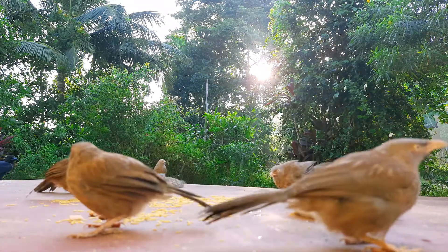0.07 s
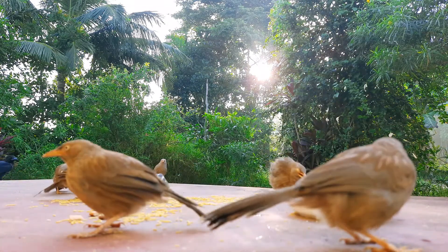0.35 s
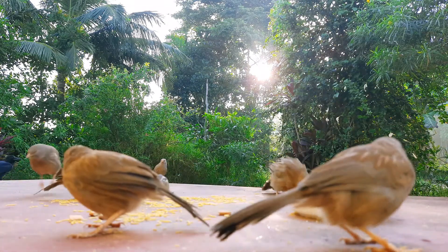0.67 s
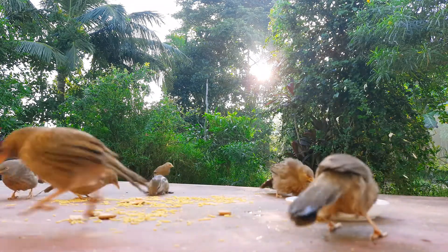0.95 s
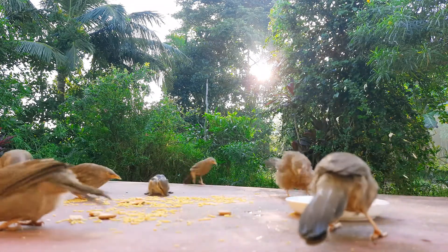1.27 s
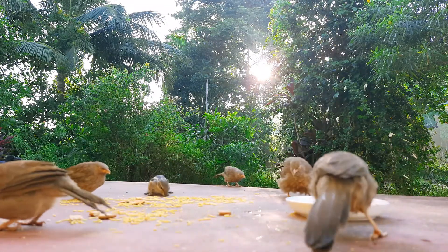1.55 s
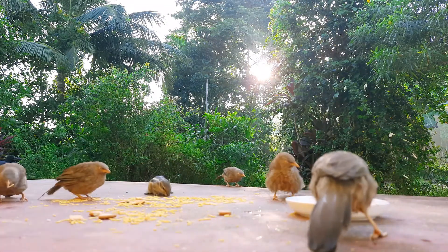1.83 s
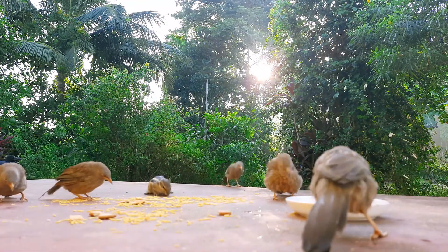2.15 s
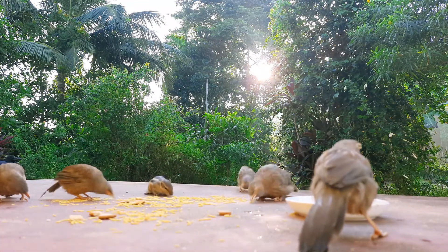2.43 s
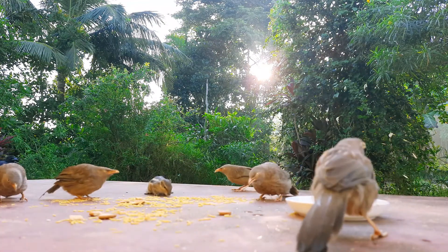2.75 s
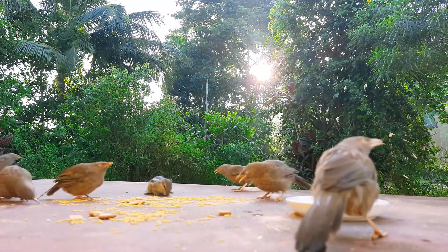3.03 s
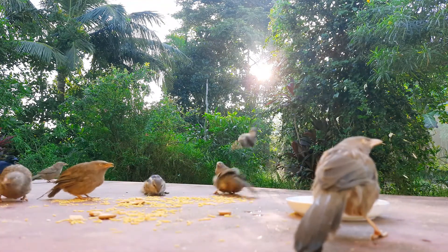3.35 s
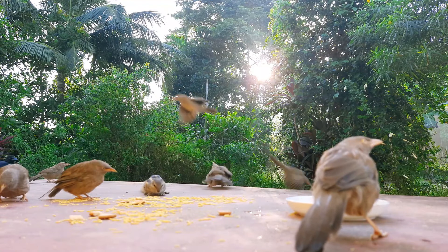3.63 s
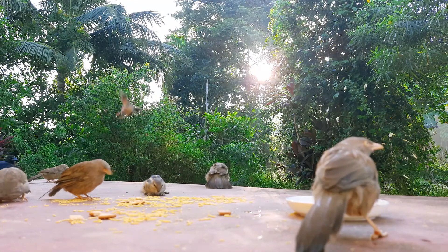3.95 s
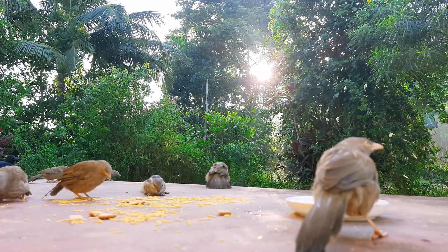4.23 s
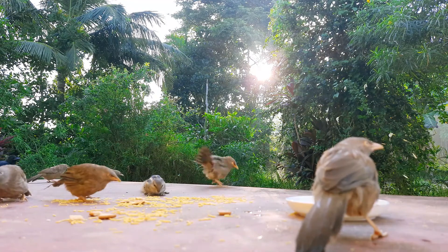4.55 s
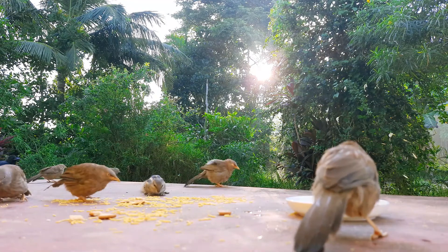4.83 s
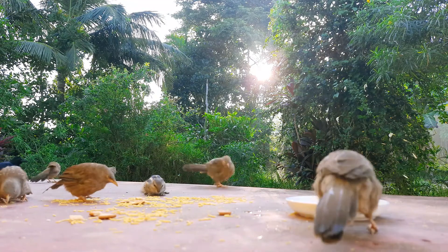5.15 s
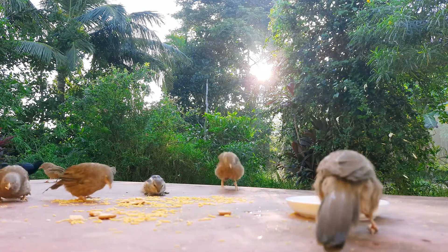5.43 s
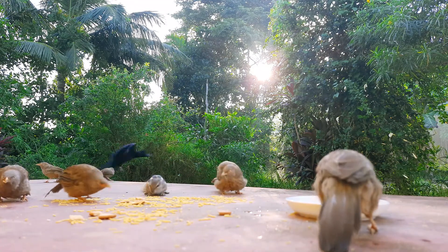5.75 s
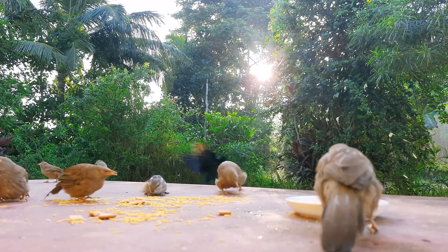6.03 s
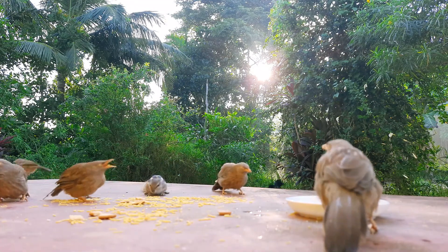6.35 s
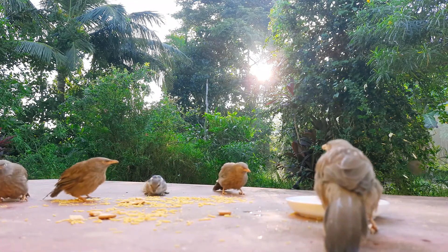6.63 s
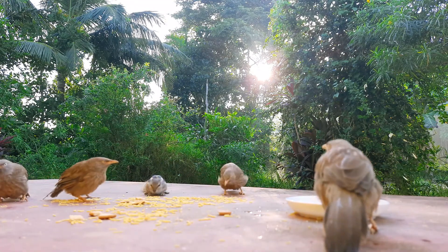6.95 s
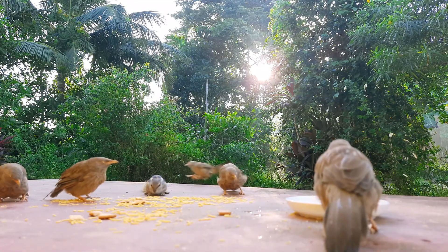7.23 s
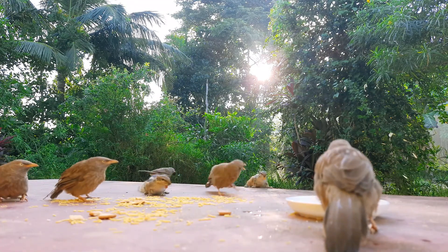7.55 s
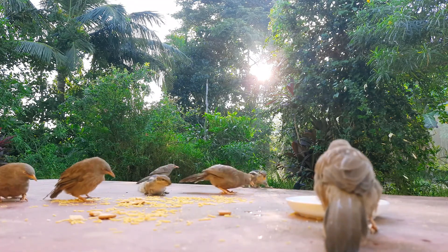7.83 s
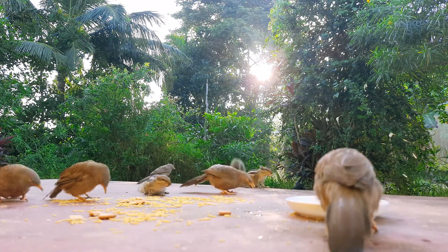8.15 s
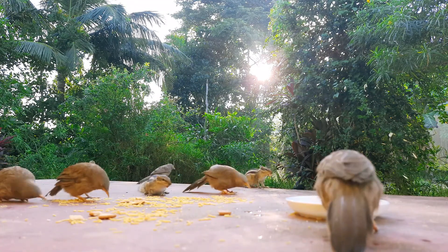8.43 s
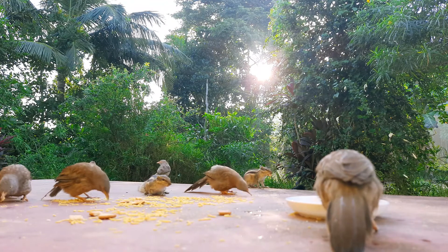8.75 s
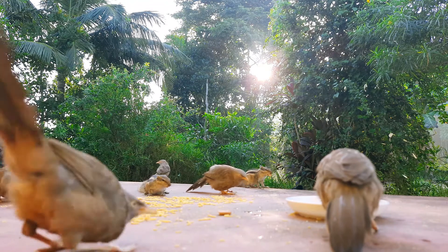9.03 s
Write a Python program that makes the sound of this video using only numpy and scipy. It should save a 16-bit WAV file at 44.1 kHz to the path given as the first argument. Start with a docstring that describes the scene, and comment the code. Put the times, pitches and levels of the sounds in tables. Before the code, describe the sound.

A flock of birds feeds close to the microphone on a garden terrace, a little to the left. It opens with a quick burst of harsh chucks, a squawk and fluttering wings. Scattered calls and pecks follow, with the sharpest clicks and more flutters a few seconds in. Farther off a dove coos and small birds trill over faint insects. Later a soft low rumble swells and fades with a few hoots.

```python
"""Babblers feed close by on a garden terrace, giving harsh falling chucks and level squawks.
Each call is a source and a filter: the syrinx gives a hoarse tone and irregular pulses, and the throat
and beak resonate. Beaks and claws tap the floor, feathers rustle and wings push puffs of air.
Farther off a dove coos with a rolling purr, small birds trill, chirp and whistle, and insects sing.
Late on, a low rumble swells and fades, with a few soft hoots. Terrace and trees add diffuse echoes."""
import sys
import numpy as np
from scipy import signal
from scipy.fft import rfft, irfft, next_fast_len
from scipy.io import wavfile
from scipy.ndimage import map_coordinates

SR = 44100
rng = np.random.default_rng(int(sys.argv[2]) if len(sys.argv) > 2 else 0)


def store_pcm(level_fs):
    """Save levels as 16-bit WAV."""
    pcm = np.round(np.clip(level_fs, -1, 1) * 32767).astype(np.int16)
    wavfile.write(sys.argv[1], SR, np.atleast_2d(pcm).T)


N = 400428

# Event levels are relative, ahead of the gains of the mix; pan is left level minus right level.
# falling calls: t/s, length/s, mid-register level/dB, start f/Hz, roughness (0-1),
# low register/dB re mid, high register/dB re mid
CHUCKS = [(0, 0.011, -49, 847, 1, 3, -2), (.046, .055, -39, 1224, 0.45, -9, -6),
          (0.138, .049, -38, 1116, 0.35, -8, -9), (0.184, .062, -40, 1001, 0.7, -1, -7),
          (.234, .042, -40, 985, 0.37, -5.5, -8), (.334, 0.043, -47, 837, 0.65, -5.5, -6),
          (0.506, .055, -57, 913.5, 0.92, 2, -4.5), (0.893, .06, -42, 908.4, 0.82, -15.5, -10),
          (2.117, .064, -71.5, 923, 0.93, 6.5, -8), (3.112, .067, -46, 1056, 0.83, 0, 0),
          (3.402, .055, -42, 1294, 0.44, -10, -3.5), (3.502, 0.044, -44.5, 1091, 0.42, -6.5, -9),
          (3.602, 0.046, -49, 1027, 0.19, -3, -11), (3.919, .066, -47.5, 993.4, 0.94, 3, -2.5),
          (4.237, .067, -47, 907, 0.89, -4, -4), (4.671, .055, -51, 1057, 0.89, 5.5, -1),
          (5.3, .072, -48.5, 1118, 0.85, -7.5, -10), (5.811, .18, -76, 954.4, 0.92, -3.5, 0),
          (6.002, .15, -78, 953, 0.88, -2.5, -1), (7.553, .047, -48, 1107, 0.68, -2.5, -10.5),
          (7.709, .055, -46, 1106, 0.71, 1, -3), (8.071, .066, -48, 1140, 0.84, -7, -11)]
# calls of nearly level pitch: the columns of CHUCKS, then pan/dB
SQUAWKS = [(.283, .064, -31, 944, .55, -7.5, 3, .5), (1.15, .2, -66.5, 770, .85, -20, -9, 4.5),
           (2.943, .06, -44.5, 810, .92, -5.5, -6, 6), (3.701, .075, -39, 830, .8, -14.5, -3, 7),
           (4.526, .061, -53, 764, .85, -4.5, -18, 7), (7.734, .063, -46, 760, .9, -4, 1, 6),
           (8.2, .09, -64, 780, .9, -1, -8, 5)]
# resonances of throat and beak in each kind of call: f/Hz, gain/dB
CHUCK_THROAT = [(250, -28), (480, -10), (750, -5), (1200, -5), (1750, 1), (2450, -1), (3200, -15),
                (4300, -3), (5350, -15), (6400, -6), (8500, -14), (11000, -27), (16000, -37)]
SQUAWK_THROAT = [(350, -30.5), (650, -8), (950, -3), (1500, -9), (2650, -0.5), (3300, -7.5), (4150, 0.5),
                 (5200, -7.5), (6300, -7.5), (8200, -21), (11000, -32.5), (16000, -34.5)]
# impacts of beak and claw on the floor: t/s, level/dB, relative treble/dB, pan/dB
TAPS = [(1.1533, -47.5, -11, 8), (1.279, -38, -7.5, 12), (1.8138, -46, -17.5, 10), (2.356, -43, -16.5, 11),
        (2.7639, -50.5, -14, 7), (2.9488, -30.5, -26.5, 5), (3.4579, -41, -10, 12),
        (3.471, -20.5, -15.5, 6), (3.4808, -40, -14, 4), (3.6022, -20.5, -22.5, 8), (4.9288, -52, -18, 4),
        (5.5794, -48, -14.5, 5.5), (8.6879, -49, -13, 10.5), (8.9142, -44.5, -14, 9), (8.99, -49, -14, 12)]
# modes of the beak: f/Hz, width/Hz (unused), level/dB
BEAK_MODES = [(1440, 420, -9), (2320, 310, -0.5), (3723, 410, -10.5), (6240, 440, -10.5)]
# feathers brushing and feet scuffing: t/s, length/s, level/dB
SCUFFS = [(0.162, .22, -51), (0.378, 0.1186, -73), (1.26, .066, -72), (2.46, .05, -68.5),
          (3.205, .066, -57), (3.297, 0.068, -62), (3.577, .09, -53.5), (3.963, .1, -67.5),
          (5.62, .14, -68.5), (7.283, 0.088, -65.5), (8.885, .18, -74)]
# spectrum of that friction: f/Hz, level/dB
RUSTLE_SPECTRUM = [(300, -16), (800, -6.5), (1400, -5), (2300, -2.5), (4000, -10.5), (7000, -5.5),
                   (11000, -15.5), (16000, -10.5)]
# bursts of low puffs of air, the first a gust, the rest wingbeats: t/s, length/s, level/dB, spectral peak f/Hz
FLUTTERS = [(0.168, .28, -47, 66.5), (0.517, 0.081, -57, 95), (2.098, .24, -67.5, 65.3),
            (3.108, .28, -60, 138), (3.568, .11, -50.5, 119), (3.934, .26, -54.5, 165.6),
            (4.223, .13, -63, 143), (7.719, 0.067, -59, 190)]
# the dove's notes: t/s, length/s, base f/Hz, lift of the opening crest/Hz, crest length/s, level/dB
COOS = [(1.456, 0.068, 550, 25, .09, -65), (2.054, 0.08, 557, 45.8, 0.087, -61.5),
        (2.268, 0.72, 586.1, 130.5, .12, -58), (3.348, .83, 605, 114.5, .39, -55),
        (4.494, 0.4, 588, 129.5, 0.33, -56.5)]
# runs of pips: start t/s, end t/s, period/s, f/Hz, level/dB, pip length/s, end f over start f
TRILLS = [(3.02, 3.891, .071, 2993, -62.5, 0.029, .95), (6.378, 7.201, 0.23, 2465, -73.5, .06, 1.05),
          (7.169, 8.199, .07, 2986, -66.5, 0.03, .95)]
# a high arched note: t/s, length/s, top f/Hz, level/dB
SQUEAK = [(7.268, 0.059, 2850, -53)]
# small birds' whistles: t/s, length/s, start f/Hz, end f/Hz, level/dB
WHISTLES = [(1.444, 0.12, 2966, 3120, -69.5), (2.794, 0.095, 2460, 2450, -76), (6.49, .07, 2184, 1760, -76),
            (8.39, .04, 2120, 2040, -72.5)]
# onsets of one far bird's buzzy chirp: t/s
CHIRP_TIMES = [.44, 1.469, 2.56, 4.42, 5.62, 6.8, 8.291]
# low distant notes: t/s, length/s, top f/Hz, level/dB
HOOTS = [(1.88, 0.25, 395.4, -74), (6.45, .14, 265.4, -60.5), (6.68, 0.35, 273, -54.5),
         (6.99, 0.3, 119.5, -52.5), (7.45, 0.219, 279.8, -61.5), (8.32, 0.18, 314, -77)]
# single crickets: f/Hz, chirp rate/Hz, level/dB
CRICKETS = [(7420, 18, -76), (7550, 13, -75.5), (7240, 3.2, -79), (8000, 9, -80.5)]
# spectrum of the insect chorus: f/Hz, level/dB
CHORUS_SPECTRUM = [(5500, -30.5), (6700, -13.5), (7450, -6.5), (8100, -7), (8700, -8), (10000, 0.5),
                   (11000, -19.5), (12500, -32.5)]
# envelope of the rumble: t/s, level/dB
RUMBLE_ENVELOPE = [(5.4, -88), (5.89, -63.5), (6.45, -65), (6.48, -52.5), (6.57, -58), (7.18, -50.5),
                   (7.44, -64), (7.55, -62.5), (8.2, -89.5)]
# spectra of the rumble and of the garden air: f/Hz, level/dB
RUMBLE_SPECTRUM = [(18, -47), (30, -20), (81, -7), (109, -8.5), (144, -2), (260, -4), (344, -21.5),
                   (398, -19.5), (1500, -43), (1950, -53.5), (3300, -120)]
AIR_SPECTRUM = [(15, -42.5), (25, -4), (130, 2.5), (170, -8.5), (217, -8), (326, -10.5), (405, -9),
                (503, -26.5), (575, -9), (911, -26), (2110, -25), (3700, -32.5), (5300, -26), (7510, -10.5),
                (8590, -19.5), (16000, -31.5)]
# reverberation times of the two spaces: f/Hz, T60/s
TERRACE_T60 = [(300, 0.32), (2000, 0.061), (10000, 0.099)]
GARDEN_T60 = [(150, 0.53), (600, 0.57), (2500, .5), (10000, 0.061)]


def babbler_calls(rows, throat, jitter, rasp_hz, breath, overtone_db, swell, lag_s_per_db=.00007):
    """Source-filter model: the syrinx mixes harmonics with irregular pulses; throat and beak resonate."""
    out = np.zeros((2, N))
    for s, length, db, start_hz, end_hz, rough, low_db, high_db, pan_db in rows:
        t = clock(length)
        n = len(t)
        glide = (end_hz / start_hz) ** (t / t[-1])
        phase = cycle(start_hz * glide * (1 + jitter * rough * wobble(n, 900)))  # an unsteady membrane
        tone = unit(sum(amp(overtone_db * max(k - 2, 0)) * np.cos(k * phase) for k in range(1, 13)))
        pulse_count = np.cumsum(rasp_hz * glide * np.exp(.35 * wobble(n, 500))) / SR
        pulses = np.diff(np.floor(pulse_count), prepend=0) * amp(2.3 * rng.standard_normal(n))
        rasp = unit(unit(pulses) + breath * rng.standard_normal(n))
        source = (np.sqrt(1 - rough) * tone + np.sqrt(rough) * rasp) * arch(t, swell)
        gape = np.exp(0.097 * rng.standard_normal())  # each opening of the beak shifts the resonances
        voice = filtered(np.pad(source, (0, 256)), lambda hz: amp(along(throat, hz * gape)))
        low = amp(low_db) * register(voice, 1150, "low")
        middle = register(voice, [1200, 3000], "band")
        high = amp(high_db) * register(voice, 3200, "high")
        left, right = panned(amp(db) * (low + middle + high), pan_db)
        add(out[0], s, left)
        add(out[1], s + lag_s_per_db * pan_db, right)  # the longer path arrives later
    return out


def chucks(end_hz=664.5, pan_db=7):
    """Exponential glide: each chuck falls from its own starting frequency to a common one."""
    rows = [(s, length, db, hz, end_hz, *timbre, pan_db) for s, length, db, hz, *timbre in CHUCKS]
    return babbler_calls(rows, CHUCK_THROAT, jitter=.15, rasp_hz=416.1, breath=0.79,
                         overtone_db=-15, swell=1.9)


def squawks(rise=1.015):
    """Aperiodic vibration and strong upper harmonics make a harsh call whose pitch barely rises."""
    rows = [(s, length, db, hz, hz * rise, *rest) for s, length, db, hz, *rest in SQUAWKS]
    return babbler_calls(rows, SQUAWK_THROAT, jitter=.06, rasp_hz=482.0, breath=0.36,
                         overtone_db=0.5, swell=1.4)


def taps(ring_db=-5, ring_t60=0.0092, tick_db=11.5, tick_t60=0.0057, lightness=.33):
    """An impact excites damped modes of the beak and a noisy tick; a lighter touch rings less."""
    out, t = np.zeros((2, N)), clock(0.033)
    tick_spectrum = [(1000, -25), (3500, -3.0), (6500, 3.5), (16000, -1)]  # f/Hz, level/dB
    for s, db, treble_db, pan_db in list(TAPS) + pecks():
        ring = np.zeros(len(t))
        for hz, _, mode_db in BEAK_MODES:
            detuned_hz = hz * (1 + 0.018 * rng.standard_normal())
            ring += amp(mode_db - 60 * t / ring_t60) * np.sin(2 * np.pi * detuned_hz * t)
        ring *= amp(ring_db + lightness * min(db + 31.0, 0)) / np.abs(ring).max()
        tick = noise(len(t), tick_spectrum, coherence=1.0) * amp(-60 * t / tick_t60)
        add(out, s, panned(amp(db) * (ring + amp(tick_db + treble_db) * tick), pan_db))
    return out


def pecks(per_s=4, db=-59, spread_db=3, treble_db=-11, pan_db=5):
    """A random point process: light pecks at crumbs, as rows like those of TAPS."""
    draws = rng.random((int(per_s * N / SR), 2))
    return [(when * N / SR, db + spread_db * (2 * force - 1), treble_db, pan_db) for when, force in draws]


def wings(beat_hz=21.74, grain_db=4.0, fade_db=9):
    """Friction of feathers gives grainy noise; gusts of air, mostly pushed by wingbeats, give low, weakening
    puffs."""
    out = np.zeros((2, N))
    for s, length, db in SCUFFS:
        t = clock(length)
        rustle = noise(len(t), RUSTLE_SPECTRUM, coherence=0.2) * amp(grain_db * wobble(len(t), 300))
        add(out, s, amp(db) * unit(rustle) * arch(t, 0.58))
    for s, length, db, hz in FLUTTERS:
        t = clock(length)
        spectrum = [(hz / 3, -18), (hz, 0), (hz * 1.2, -6), (hz * 4, -26), (hz * 30, -70)]
        gust = noise(len(t), spectrum, coherence=(hz / 180) ** 2)  # deep gusts hit each side separately
        beats = amp(2.0 * np.sin(2 * np.pi * beat_hz * t) - fade_db * t / length)
        add(out, s, amp(db) * unit(gust * beats) * arch(t, 0.29))
    return panned(out, 4.2)


def dove(scoop_hz=44.5, scoop_s=0.0303, sink_hz_per_s=80, fade_db_per_s=11):
    """Frequency modulation shapes each coo: it scoops up to a crest, then sinks; long ones purr."""
    notes = []
    for s, length, hz, lift_hz, crest_s, db in COOS:
        t = clock(length)
        crest = np.abs(np.sin(np.pi * np.minimum(t / crest_s, 1))) ** 1.3
        pitch = hz + lift_hz * crest - scoop_hz * np.exp(-t / scoop_s) - sink_hz_per_s * t
        notes.append((s, pitch, db - fade_db_per_s * t))
    return cries(notes, overtone_db=-33.5, waver=0.0199, roll=0.86)


def cries(notes, overtone_db, waver, roll=0, roll_hz=36, roll_bend=0.0705):
    """A fundamental and its octave; periodic modulation of amplitude and frequency makes a roll."""
    out = np.zeros(N)
    for s, hz, db in notes:
        t = np.arange(len(hz)) / SR
        depth = np.clip(roll * (t - .03) / .06, 0, 1) * (t[-1] > .2)  # long notes roll, after the onset
        pulse_position = cycle(roll_hz * (1 + 0.13 * wobble(len(t), 30.34))) / (2 * np.pi) % 1
        sag = roll_bend * depth * (3 * np.exp(-6 * pulse_position) - .3)  # pitch drops in each pulse
        phase = cycle(hz * (1 + waver * wobble(len(t), 79.38) + sag))
        tone = unit(np.sin(phase) + amp(overtone_db) * np.sin(2 * phase))
        pulses = 1 - depth + depth * np.sqrt(2) * np.sin(np.pi * pulse_position)
        add(out, s, amp(db) * pulses * arch(t, 0.16) * tone)
    return out


def arched(table, bend, taper_db):
    """Cubic contours (onset, pitch, level) for notes that rise, hold and drop again."""
    for s, length, hz, db in table:
        edge = np.abs(np.linspace(-1, 1, len(clock(length)))) ** 3
        yield s, hz * (1 - bend * edge), db - taper_db * edge


def trills(sag=0.069, fade_db=-5.0):
    """Periodic trains of gliding pips, whose frequency and level fall toward the end of each run."""
    out = np.zeros(N)
    for first, last, period, hz, db, length, glide in TRILLS:
        for s in np.arange(first, last, period):
            decline = ((s - first) / (last - first)) ** 2
            pitch = hz * (1 - sag * decline)
            add(out, s, amp(db + fade_db * decline) * pip(length, pitch, pitch * glide, waver=.012))
    return out


def pip(length, start_hz, end_hz, waver):
    """A linear sine sweep of rms 1, roughened by random frequency modulation."""
    t = clock(length)
    pitch = np.linspace(start_hz, end_hz, len(t)) * (1 + waver * wobble(len(t), 700))
    return unit(np.sin(cycle(pitch)) * arch(t, .7))


def squeak(flicker_db=7):
    """Fast random amplitude modulation roughens one high, steeply arched note."""
    tone = cries(arched(SQUEAK, bend=.38, taper_db=6), overtone_db=-12, waver=.012)
    return tone * unit(amp(flicker_db * wobble(N, 900)))


def whistles(chirp_s=.11, chirp_hz=5200, chirp_db=-74, flicker_db=5):
    """Random modulation spreads small birds' whistles and buzzy chirps into narrow bands."""
    out = np.zeros(N)
    tones = [(s, db, pip(length, start, end, waver=0.036)) for s, length, start, end, db in WHISTLES]
    tones += [(s, chirp_db, pip(chirp_s, chirp_hz, chirp_hz, waver=.06)) for s in CHIRP_TIMES]
    for s, db, tone in tones:
        add(out, s, amp(db) * unit(tone * amp(flicker_db * wobble(len(tone), 120))))
    return out


def hoots():
    """Nearly sinusoidal vibration: soft low notes with a shallow arch of pitch."""
    return cries(arched(HOOTS, bend=0.051, taper_db=4), overtone_db=-28.5, waver=0.0073)


def insects(chorus_db=-72.0):
    """A few crickets pulse high carrier tones; many more sum incoherently to a hiss."""
    crickets = np.zeros(N)
    for hz, rate, db in CRICKETS:
        chirps = np.maximum(np.sin(cycle(rate * (1 + 0.33 * wobble(N, 12)))) + 0.31, 0)
        sway = amp(2.5 * wobble(N, 5))
        carrier = np.sin(cycle(hz * (1 + .007 * wobble(N, 400))))
        crickets += amp(db) * unit(chirps * sway * carrier)
    reflections = 0.47 * echo(crickets, GARDEN_T60)
    chorus = amp(chorus_db + 0.61 * wobble(N, 6.7)) * noise(N, CHORUS_SPECTRUM, coherence=0.64)
    return crickets + reflections + chorus


def background(air_db=-68, sway_db=1.2, rumble_db=-1.5):
    """Coloured noise under slow envelopes: still garden air, and a far rumble that swells and fades."""
    air = amp(air_db + sway_db * wobble(N, 1.706)) * noise(N, AIR_SPECTRUM, coherence=0.66)
    s, db = np.transpose(RUMBLE_ENVELOPE)
    swell = np.interp(np.arange(N) / SR, s, amp(db + rumble_db), left=0, right=0)
    return air + swell * noise(N, RUMBLE_SPECTRUM, coherence=0.73)


def echo(x, t60):
    """Diffuse reflection from trees and walls: convolution with exponentially decaying noise."""
    hz, t, bands = signal.stft(rng.standard_normal((2, SR * 3 // 4)), SR, nperseg=256)
    tail = signal.istft(bands * amp(-60 * t / along(t60, hz)[:, None]), SR, nperseg=256)[1]
    return signal.fftconvolve(np.atleast_2d(x), tail / np.linalg.norm(tail[0]), axes=1)[:, :N]


def amp(db):
    """Amplitude ratio of a level."""
    return 10 ** (np.asarray(db) / 20)


def unit(x):
    """x scaled to rms 1."""
    return x / np.sqrt(np.mean(x ** 2) + 1e-20)


def along(points, hz):
    """Interpolation of (f/Hz, value) points on a log frequency axis."""
    f, values = np.transpose(points)
    return np.interp(np.log(hz + 1), np.log(f + 1), values)


def clock(length):
    """Sample times of a short sound."""
    return np.arange(max(int(length * SR), 64)) / SR


def wobble(n, rate):
    """A smooth random curve with rate knots a second."""
    return map_coordinates(rng.standard_normal(int(n * rate / SR) + 4), [np.arange(n) * rate / SR])


def filtered(x, response):
    """Zero-phase filtering: the spectrum of x times a frequency response."""
    n = x.shape[-1]
    padded = next_fast_len(n + 2048)
    return irfft(rfft(x, padded) * response(np.fft.rfftfreq(padded, 1 / SR)), padded)[..., :n]


def register(voice, edges_hz, kind):
    """One frequency band of a voice, at rms 1."""
    return unit(signal.sosfilt(signal.butter(4, edges_hz, kind, fs=SR, output="sos"), voice))


def noise(n, spectrum, coherence):
    """Stereo noise of rms 1; coherence is the share of power common to both sides."""
    left, right, common = rng.standard_normal((3, n))
    shared = np.clip(coherence, 0, 1)
    white = np.sqrt(1 - shared) * np.array([left, right]) + np.sqrt(shared) * common
    return unit(filtered(white, lambda hz: amp(along(spectrum, hz))))


def arch(t, power):
    """A swell and fade of rms 1."""
    return unit(np.abs(np.sin(np.pi * t / t[-1])) ** power)


def cycle(hz):
    """Phase as the time integral of frequency."""
    return 2 * np.pi * np.cumsum(hz) / SR


def panned(x, pan_db):
    """Direction from a level difference between left and right."""
    sides = amp([[pan_db / 2], [-pan_db / 2]])
    return x * sides / sides.mean()


def add(out, s, x):
    """Superpose x on out at time s."""
    part = out[..., max(round(s * SR), 0):][..., :x.shape[-1]]
    part += x[..., :part.shape[-1]]


def scene():
    """Direct and reflected sound superpose: near babblers, far birds and garden, all a little left."""
    babblers = chucks() + squawks() + taps() + wings()
    songbirds = trills() + squeak()
    coos, hooting, whistling = dove(), hoots(), whistles()
    coos_stereo = np.array([coos, np.roll(coos, round(0.00041 * SR))])  # the left side hears it first
    distant = amp(-1.5) * songbirds + amp(-7.5) * echo(songbirds, GARDEN_T60)
    distant += amp(-10) * whistling + amp(-5) * echo(whistling, GARDEN_T60)
    distant += amp(1.5) * coos_stereo + amp(-3) * echo(coos, GARDEN_T60)
    distant += amp(-2.5) * hooting + amp(-10) * echo(hooting, GARDEN_T60)
    garden = panned(insects(), 2.2) + panned(background(), 2.5)
    near = babblers + amp(-9) * echo(babblers, TERRACE_T60) + amp(-32.5) * echo(babblers, GARDEN_T60)
    return near + panned(distant, 5.4) + garden


def record(dry):
    """Band limiting: the microphone weakens the deepest bass and passes nothing above 16 kHz."""
    return filtered(dry, lambda hz: (hz < 16000) * amp(along([(22, -22.0), (33, -5.5), (42, 0)], hz)))


dry = scene()
out = record(dry)
store_pcm(out)
```